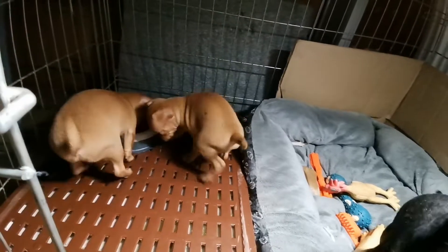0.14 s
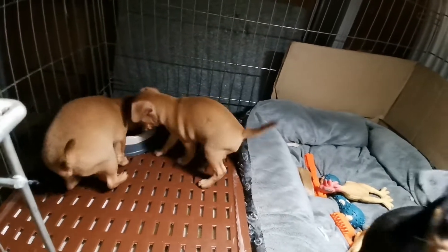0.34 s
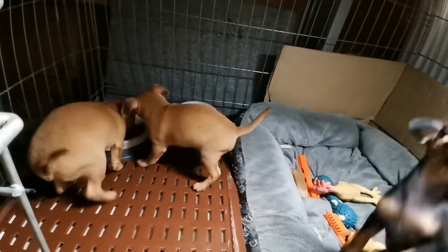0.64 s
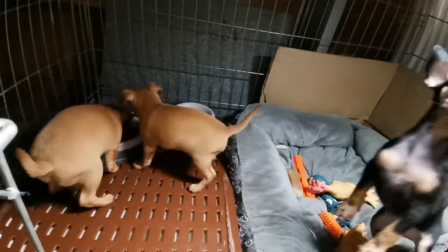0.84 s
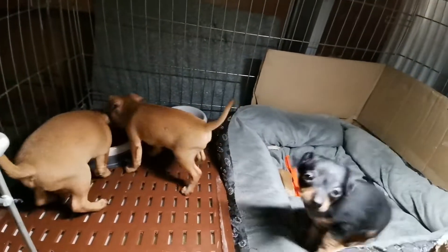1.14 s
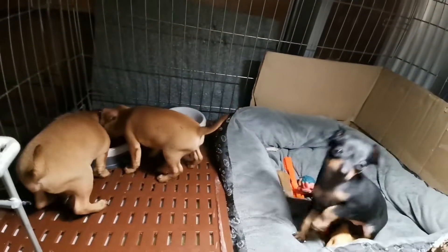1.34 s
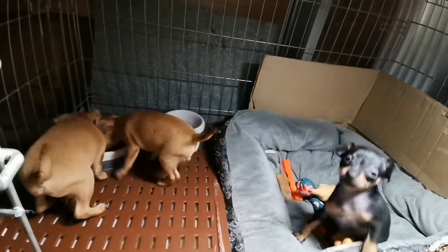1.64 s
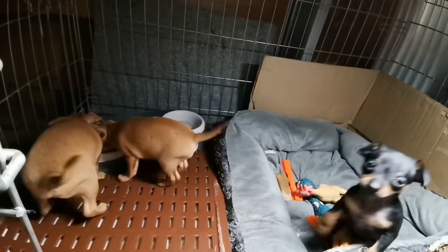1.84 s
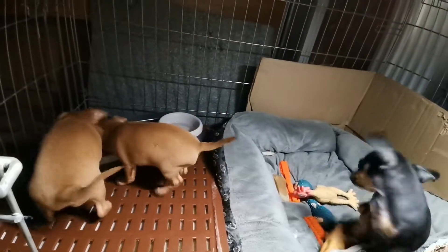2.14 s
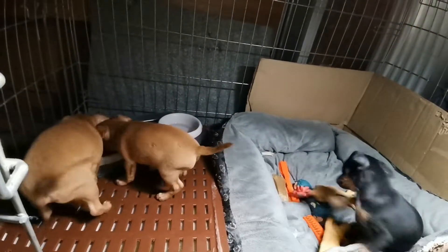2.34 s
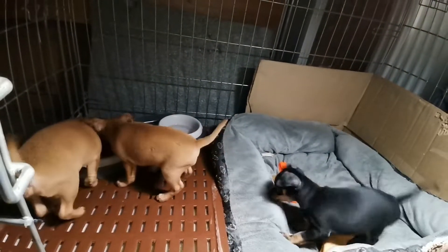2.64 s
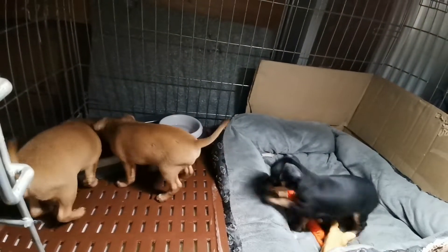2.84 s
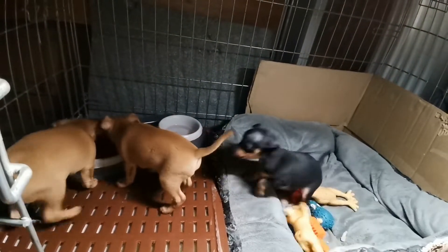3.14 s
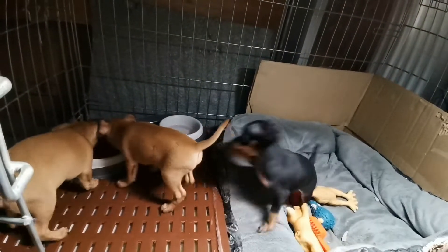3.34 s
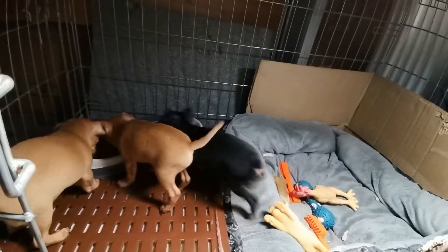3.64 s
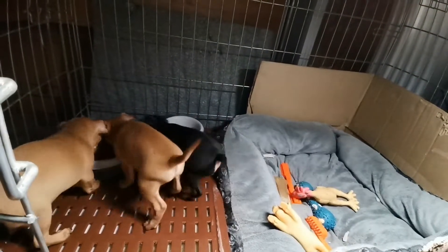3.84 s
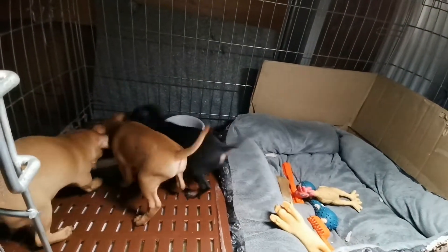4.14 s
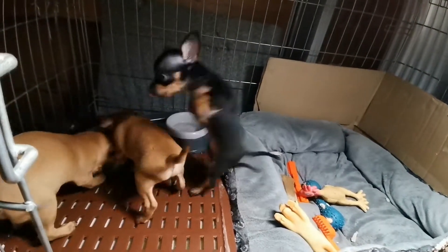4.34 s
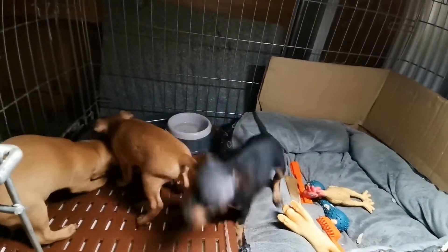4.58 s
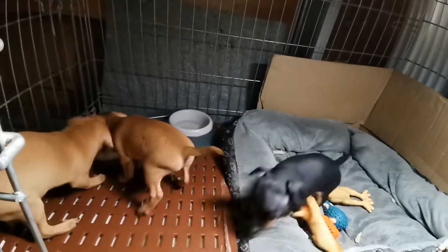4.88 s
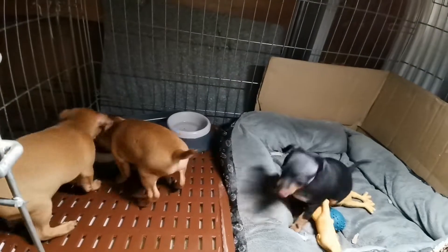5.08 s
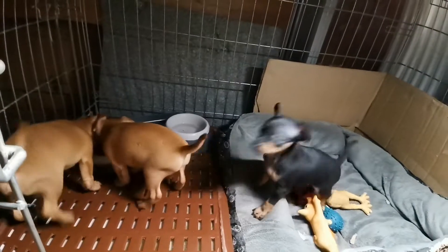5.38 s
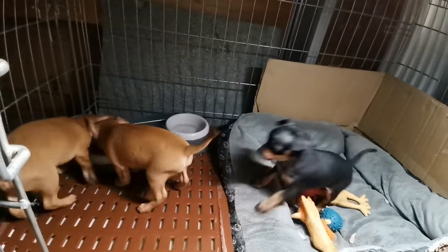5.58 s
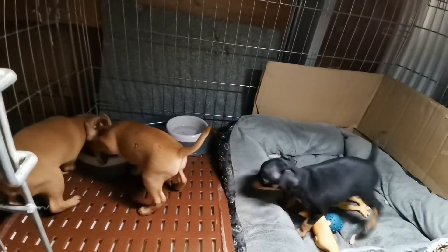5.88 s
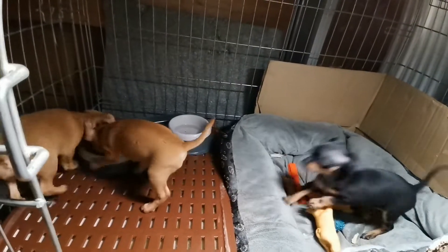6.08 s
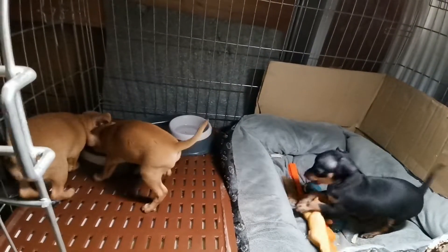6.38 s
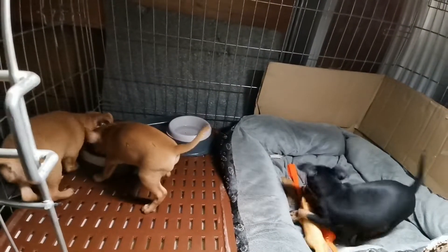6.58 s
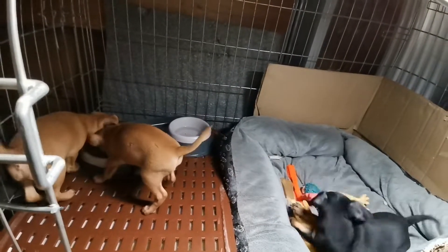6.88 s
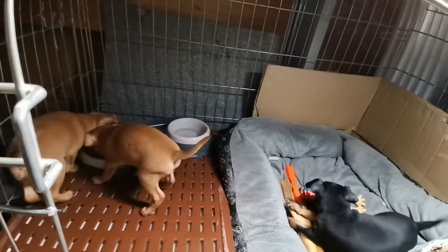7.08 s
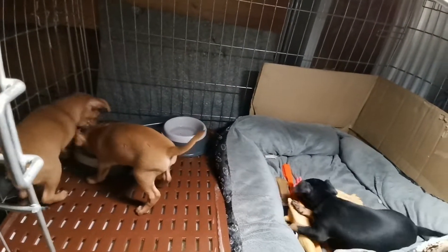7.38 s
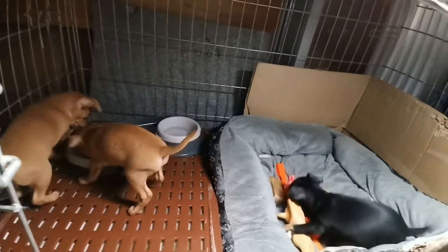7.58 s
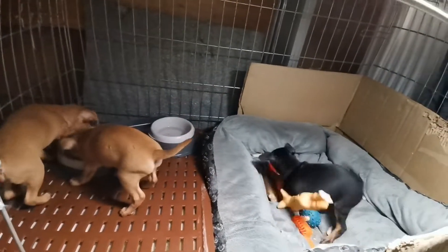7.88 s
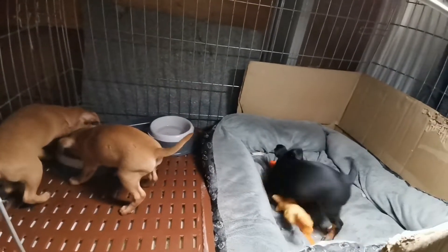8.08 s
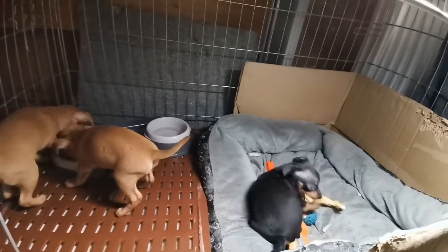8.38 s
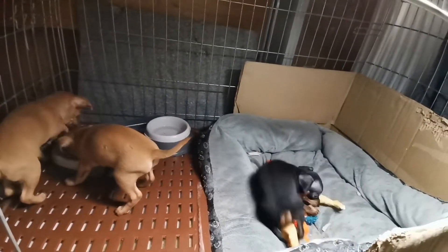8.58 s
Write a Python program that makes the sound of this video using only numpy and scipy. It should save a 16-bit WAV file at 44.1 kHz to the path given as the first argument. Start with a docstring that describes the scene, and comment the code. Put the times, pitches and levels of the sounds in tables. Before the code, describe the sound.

Puppies crunch dry kibble from a rattling bowl while another romps over soft bedding with thuds and knocks, whining hoarsely and giving a short yip.

```python
"""Kibble crunched by two puppies at a bowl on a plastic floor, in a wire pen indoors; a third romps in a cloth bed.
Pellets: noise bursts through bowl modes; teeth: narrow clicks; paws: blows through floor-panel modes.
Bedding and a slide on cardboard: grainy filtered noise under swelling gains; snuffles: nostril hiss.
Late on a puppy whines: harmonic whistles break into lower, hoarse whimpers, then a short yip and a noise snarl."""
import sys
import numpy as np
from scipy import signal
from scipy.fft import rfft, irfft, next_fast_len
from scipy.io import wavfile
from scipy.ndimage import uniform_filter1d

SR = 44100
rng = np.random.default_rng(int(sys.argv[2]) if len(sys.argv) > 2 else 0)


def output_pcm(signal):
    """Save a mono or channel-first signal as 16-bit PCM at the path in sys.argv[1].

    Samples are clipped to [-1, 1] before scaling.
    """
    pcm = np.clip(np.atleast_2d(signal).T, -1, 1) * 32767
    wavfile.write(sys.argv[1], SR, np.round(pcm).astype(np.int16))


N = 384552
T_S = np.arange(N) / SR
HIT_SAMPLES = 8192
TOP_HZ = 16100  # highest partial and final cutoff

# room tone spectrum: f/Hz, density/dB
ROOM_TONE = [(20, 4), (50, 3), (100, -9.5), (200, -14), (400, -19), (800, -22), (1600, -28), (3200, -30.5),
             (6000, -36.5), (9000, -42), (16000, -23)]
ROOM_TONE_DB = -55
# response of the two microphone ports: f/Hz, left/dB, right/dB
PORTS = [(101, -1, -1.5), (2580, 4, 4.5), (6600, 4, 0), (9940, -2.5, -4.5), (9260, -14, -17),
         (12200, -9, -14), (13800, -2, -14.5), (16300, -12.5, -15)]

# nostril air: t/s, length/s, level/dB
SNIFFS = [(4.02, 0.025, -55.5), (8.09, .05, -63), (8.31, 0.028, -52)]
SNIFF_ATTACK_S, SNIFF_RELEASE_DB_PER_S = 0.019, 260
# nostril hiss spectrum: f/Hz, density/dB
SNOUT = [(2000, -12), (4500, -37), (6000, 8.5), (7000, 5), (8000, -7), (10000, -6), (14000, -30)]
# hoarse snarl trailing off the yip: t/s, growl/dB, hiss/dB
SNARL = [(7.68, -40, -47), (7.69, -29.5, -59), (7.724, -52.5, -44.5), (7.738, -41.5, -47.5),
         (7.792, -61, -48), (7.85, -51.5, -54)]
# hoarse throat noise spectrum: f/Hz, density/dB
GROWL = [(150, -50), (330, -16.5), (600, -5), (900, 4), (1250, -11), (2000, -24.5), (3200, -39)]

# voiced whimpers, last one the yip: t/s, pitch/Hz, level/dB, bright overtones/dB, rasp/dB (before trim)
WHIMPERS = [
    [(6.365, 679, -49.5, -44.5, -50), (6.392, 486.4, -29, -50.5, -51.5), (6.435, 463, -35.5, -40, -46.5),
     (6.48, 508.7, -37, -49, -54.5), (6.562, 538, -42, -47, -50.5), (6.62, 610.6, -43, -49.5, -57),
     (6.67, 521, -41.5, -48.5, -53), (6.695, 488, -35.5, -50, -53.5), (6.755, 440.7, -45, -51, -57.5),
     (6.8, 420, -58, -71, -73)],
    [(7.025, 627, -50, -43.5, -55), (7.081, 647.4, -41, -50.5, -56), (7.099, 622.4, -50, -44, -62),
     (7.117, 505, -42.5, -61, -60), (7.125, 517, -41, -72, -56)],
    [(7.648, 620, -49, -67, -74), (7.662, 602.6, -38, -54, -59), (7.69, 645, -36.5, -46, -51),
     (7.705, 664, -48, -43.5, -46)],
]
# throat resonance: f/Hz, gain/dB
THROAT = [(400, 8), (500, -16.5), (600, -7), (750, -16), (950, 10.5), (1100, -12), (1300, -9.5),
          (1700, -50)]
# mouth resonance: f/Hz, gain/dB
MOUTH = [(1300, 6), (1500, -1.5), (2000, -0.5), (2450, -7), (3000, -18), (4000, -3)]
# high rasp of the voice: f/Hz, gain/dB
RASP = [(2400, -10), (3200, -10), (4300, -9), (5200, -6), (6400, 0), (7100, -6), (8000, -15), (9500, -26),
        (13000, -34)]
# roughness 0-1: steady, added where a whistle breaks, added as the voice frays out
STEADY_ROUGH, BREAK_ROUGH, FRAY_ROUGH = .26, .6, .7
BREAK_S, FRAY_S = .018, .05
# thin whines: t/s, pitch/Hz, level/dB, overtones/dB (before trim)
WHISTLES = [
    [(5.868, 1605, -60, -58), (5.88, 1650, -35.5, -72), (5.928, 1778, -39.5, -56),
     (5.966, 1682, -30, -47.5), (5.994, 1607, -50.5, -40), (6.04, 1534, -57, -84)],
    [(6.23, 1330, -56, -89), (6.24, 1340, -38.5, -100), (6.256, 1345, -41.5, -65),
     (6.306, 1402, -38, -55.5), (6.344, 1443, -40, -54), (6.372, 1370, -33, -52)],
    [(6.96, 1346, -38, -46), (6.966, 1434, -48, -65), (6.986, 1440, -41, -55), (7.03, 1480, -51, -48)],
]
# very high squeak before the whines: t/s, pitch/Hz, level/dB
SQUEAK = [(5.51, 9760, -60), (5.544, 9650, -49), (5.56, 9300, -50), (5.575, 9400, -78)]
# nose resonance: f/Hz, gain/dB
NOSE = [(2830, -9), (2900, 6), (3300, 1.5), (4200, -12), (5500, -0.5), (6900, -8.5), (8300, -24.5),
        (12000, -33)]
# cardboard echo, left row then right: delay/s, level/dB
ECHOES = [(.0021, -10.5), (.0034, -10)]
VOICE_ROOM_DB = -14

# bed sliding along the cardboard: t/s, length/s, level/dB
SLIDES = [(1.345, .21, -50)]
SLIDE_ATTACK_S, SLIDE_SAG_DB_PER_S, SLIDE_RELEASE_DB_PER_S = 0.023, 42, 400
# drone of the cardboard wall: f/Hz, density/dB
CARDBOARD = [(180, -0.5), (300, 9.5), (380, 0), (500, -20), (720, -0.5), (900, -6), (1200, -33),
             (3000, -50)]

# weight landing on cushion or floor: t/s, bearing down/s, level/dB
STEPS = [(0.06, 0.058, -63), (0.33, 0.63, -47.5), (1.1, .11, -45.5), (1.29, 0.14, -45.5), (1.48, .05, -62),
         (2.4, 0.073, -49), (2.535, 0.017, -43.5), (2.67, 0.036, -60), (2.92, 0.28, -55), (3.15, 0.12, -45),
         (3.24, 0.078, -37.5), (3.49, 0.057, -49), (3.58, 0.1, -47.5), (3.675, 0.035, -61),
         (3.8, 0.072, -48.5), (3.97, 0.26, -53.5), (4.19, 0.044, -51.5), (4.33, 0.072, -48.5),
         (4.49, .08, -52.5), (4.61, 0.053, -44.5), (4.72, 0.18, -37.5), (4.9, 0.18, -45),
         (5.09, 0.056, -38.5), (5.21, .1, -47), (5.52, 0.31, -56), (5.91, 0.042, -45), (6.07, 0.21, -46.5),
         (6.38, 0.082, -51), (6.68, 0.14, -50), (6.78, 0.053, -53), (7.02, 0.037, -57), (7.21, 0.039, -55),
         (7.85, .06, -47), (7.91, 0.085, -39.5), (8.02, 0.12, -44), (8.28, 0.25, -49.5),
         (8.61, 0.12, -52.5)]
STEP_ATTACK_S, STEP_SAG_DB_PER_S, STEP_RELEASE_DB_PER_S = 0.026, 14.5, 162
FIDGET_DB, FIDGET_SWING_DB = -62.5, 4  # small shifts of weight between steps
# flank or paw brushing cloth: t/s, length/s, rub/dB, hiss/dB
SCUFFS = [(0.31, 0.12, -67, -56), (0.352, 0.23, -52.5, -49), (0.55, 0.15, -58, -61),
          (0.71, 0.046, -54, -52), (1.144, 0.13, -60, -60), (1.291, 0.054, -53, -82),
          (1.722, 0.12, -62, -64), (1.928, 0.25, -79, -65.5), (2.262, .15, -62.5, -62.5),
          (2.495, 0.064, -72, -64), (2.887, 0.19, -63.5, -67), (3.153, 0.23, -56.5, -70),
          (3.658, 0.2, -55.5, -66), (3.805, 0.14, -61, -59), (4.015, 0.064, -75, -59),
          (4.094, 0.024, -56, -62), (4.477, 0.074, -51, -57.5), (4.713, .13, -43, -48),
          (4.845, 0.1, -48, -68.5), (4.966, 0.045, -46.5, -52), (5.064, 0.091, -53.5, -70),
          (5.856, 0.13, -50.5, -65), (6.031, 0.16, -55, -62), (6.744, 0.44, -62, -68),
          (7.847, 0.27, -57, -70), (8.087, 0.3, -61, -67), (8.266, 0.23, -62, -66)]
SCUFF_ATTACK_S, SCUFF_SAG_DB_PER_S, SCUFF_RELEASE_DB_PER_S = 0.027, 17, 209
FUR_RUB_DB, FUR_HISS_DB = -74, -73  # feeders' coats brushing together
# cushion thud spectrum: f/Hz, density/dB
CUSHION = [(25, -2.5), (55, -4), (90, 2), (130, -2), (180, -1), (300, -11.5), (500, -19.5), (1000, -48)]
# cloth rub spectrum: f/Hz, density/dB
RUB = [(150, -41), (330, 3), (550, -2.5), (780, -1), (1000, -0.5), (1500, -8), (2500, -13), (5000, -26.5)]
# fibre and breath hiss spectrum: f/Hz, density/dB
HISS = [(900, -31), (1800, -6.5), (3000, -5), (4500, 0.5), (7000, -5), (9000, -2.5), (12000, 0.5),
        (16000, -6.5)]

# source levels; event levels of kibble, teeth and paws count from these
KIBBLE_DB, TEETH_DB, PAWS_DB = -9.5, -7, 2
# paw or body on floor, bed or cardboard: t/s, knock/dB, low thud/dB, treble slope/dB per octave (soft pads steep)
KNOCKS = [(.512, -4, -16, -8.5), (.657, -15, -25, -6), (1.117, 0, -5, -18), (1.125, -1.5, -13, -12),
          (1.216, 1.5, -14, -15.5), (1.377, -13, -28, -16), (1.593, -15.5, -23.5, -21),
          (2.549, -0.5, -14.5, -4), (3.163, -14, -22, -1), (3.183, -8.5, -14, -5.5), (3.212, -1, -14, -8.5),
          (3.257, 0.5, -10, -6), (3.684, -8, -10.5, -7.5), (3.695, -11, -16, -5), (3.777, -19, -23, -2.5),
          (4.337, -50, -19.5, -12), (4.406, -6.5, -14, -21), (4.617, -14.5, -9, -10),
          (4.733, -3, -14, -9.5), (4.747, -11, -27, -12), (4.767, -10, -23, -4.5), (4.787, -15.5, -26, 1),
          (4.846, -16.5, -22, 0), (4.973, -13.5, -26, -2.5), (5.096, -27, -14, -1.5),
          (5.144, -20, -10.5, -5), (5.55, -15.5, -33, -20), (5.823, -6, -34, -11), (6.093, -13, -35, -8),
          (7.857, -7, -24, -16), (7.906, -7.5, -17.5, -35), (7.946, -8, -27, -5), (8.085, -3, -12, -19),
          (8.375, -9.5, -20, -27), (8.396, -9, -20, -39)]
# floor panel modes, nominal: f/Hz, width/Hz, gain/dB
PANEL = [(184, 45, 5.9), (595, 170, 2.3), (770, 150, 6.4), (1016, 94, 13.8), (1830, 1000, 5.1),
         (3180, 700, 6.9)]
PAW_RATTLE_S, PAW_CONTACT_DB = 0.0047, -2
# teeth closing on crumbs: t/s, level/dB, click pitch/Hz
CHEWS = [(1.754, -16, 4140), (2.077, -15, 4430), (2.258, -16.5, 4200), (2.313, -13.5, 4570),
         (2.335, -8, 4580), (2.378, -11, 4730), (2.589, -8, 4550), (2.634, 1, 4800), (2.843, -5.5, 4960),
         (2.861, -9, 4800), (2.891, -10, 4830), (2.945, -9.5, 4660), (4.389, -15, 5900), (5.739, -19, 7100),
         (6.057, -5.5, 5130), (7.088, -12, 5100), (7.443, -20, 4270)]
NIBBLES, NIBBLE_MIN_DB, NIBBLE_MID_HZ = 30, -30, 4700  # faint bites at random times
# pellet breaking or dropping in the bowl: t/s, crack/dB, bowl ring/dB, brittle snap/dB
CRACKS = [(.08, -11, -11, -12), (.115, -15, -9.5, -40), (.196, -26, -12.5, -43), (.22, -13.5, -11, -12.5),
          (0.971, -22, -27, -28), (1.82, -11.5, -20, -9.5), (1.858, -6, -9.5, -23), (1.98, -12, -13.5, -30),
          (2.001, -15, -7, -50), (2.478, -9, -8.5, -19), (2.694, -17, -53, -18), (2.754, -16.5, -52, -16),
          (3.14, -11.5, -21, -3), (3.831, -17.5, -11, -35), (3.978, -11, -24, -10.5), (4.16, -1, 3, -4.5),
          (4.198, -14, -10, -16), (4.222, -16, -14, -25), (4.272, -24, -38, -17), (4.497, -5, -9.5, -9),
          (4.532, -16, -6.5, -28), (4.719, -11, -21, -8.5), (4.91, -43, -6, -51),
          (5.298, -5.5, -17.5, -8.5), (5.331, -20, -13.5, -43), (5.534, -20.5, -5.5, -31),
          (5.991, -6.5, -9.5, -8.5), (6.174, -26, -21, -17.5), (6.297, -12, -10, -23),
          (6.661, -8, -19, -25), (6.899, -21.5, -38, -21), (6.964, -11.5, -13, -10),
          (7.942, -13.5, -19, -13), (8.262, -7, -15, -7.5), (8.272, -5.5, -18, -25)]
# bowl modes, nominal: f/Hz, width/Hz, gain/dB
BOWL = [(1520, 300, 12), (2400, 340, 12), (4100, 600, 8), (4850, 400, 7), (6200, 900, 3)]
CRUMBLE_S, BOWL_RATTLE_S = .0028, .0035
KIBBLE_PAN_DB, KIBBLE_PAN_SPREAD_DB = 3, 2  # left minus right


def undb(db):
    """Decibels to gain."""
    return 10 ** (np.asarray(db) / 20)


def unit(x):
    """Scale to rms 1."""
    return x / np.sqrt(np.mean(x ** 2) + 1e-18)


def curve(rows):
    """Every column of a time table, sample by sample."""
    t_s, *columns = np.transpose(rows)
    return [np.interp(T_S, t_s, c) for c in columns]


def gate(rows, edge_s):
    """Open over the span of a table, with soft edges."""
    inside_s = np.minimum(T_S - rows[0][0], rows[-1][0] - T_S)
    return np.clip(inside_s / edge_s + .5, 0, 1)


def db_at(points, hz):
    """Read a spectrum on a log-frequency axis."""
    f_hz, db = np.transpose(points)
    return np.interp(np.log(hz + 1), np.log(f_hz), db)


def bins_hz(size):
    """Frequencies of a real transform."""
    return np.arange(size // 2 + 1) * SR / size


def colour(x, points):
    """Filter by a spectrum."""
    size = next_fast_len(x.shape[-1], True)
    gain = undb(db_at(points, bins_hz(size)))
    return irfft(rfft(x, size) * gain, size)[..., :x.shape[-1]]


def diffuse(size, apart_hz=1100):
    """Noise from all sides at two ports: alike in the bass, unrelated in the treble."""
    fast = next_fast_len(size, True)
    mid, side = rfft(rng.standard_normal((2, fast)))
    like = .85 / (1 + (bins_hz(fast) / apart_hz) ** 2)
    side = side * np.sqrt(1 - like) * np.array([[1], [-1]])
    return unit(irfft(mid * np.sqrt(1 + like) + side, fast)[:, :size])


def walk(rate_hz, size=N):
    """Random levels held 1 / rate_hz and slewed; spread near 1."""
    hold = max(int(SR / rate_hz), 2)
    steps = np.repeat(rng.standard_normal(size // hold + 1), hold)
    return 1.065 * uniform_filter1d(steps, hold)[:size]


def add(out, t_s, sound):
    """Mix a short sound in at t_s."""
    i = max(int(t_s * SR), 0)
    out[:, i:i + sound.shape[1]] += sound[:, :N - i]


def swells(rows, attack_s, sag_db_per_s, release_db_per_s):
    """Gain of overlapping movements: each builds up, sags while it lasts, dies away; powers add."""
    power = np.zeros((1, N))
    for start_s, length_s, db in rows:
        t_s = np.arange(int((length_s + .5) * SR)) / SR
        fall_db = sag_db_per_s * t_s + release_db_per_s * np.maximum(t_s - length_s, 0)
        gain = np.minimum(t_s / attack_s, 1) * undb(db - fall_db)
        add(power, start_s, gain[None] ** 2)
    return np.sqrt(power[0])


def rustle(spectrum, grain_db, grain_hz, surge_db):
    """Fibres catch and let go in tiny slips, bunched into surges; tanh bounds the largest slip."""
    slips_db = grain_db * np.tanh(walk(grain_hz)) + surge_db * np.tanh(walk(45))
    return unit(colour(diffuse(N) * undb(slips_db), spectrum))


def resonances(modes, scatter=0):
    """dB that a body's modes add to a blow; pitch and strength scatter with the spot struck."""
    hz = bins_hz(HIT_SAMPLES)
    spots = scatter * rng.uniform(-1.67, 1, (len(modes), 2))
    total_db = 0
    for (f_hz, width_hz, db), (shift, strength) in zip(modes, spots):
        detune = 2 * (hz - f_hz * (1 + shift)) / width_hz
        total_db = total_db + db * (1 + 5 * strength) / (1 + detune ** 2)
    return total_db


def blow(gain_db, rattle_s, contact_db, tail_db, tail_t60_s):
    """Contact, burst of after-contacts and near echoes, and room tail, through a causal body response."""
    t_s = np.arange(HIT_SAMPLES) / SR
    grain = np.repeat(undb(7 * np.tanh(rng.standard_normal(HIT_SAMPLES // 32))), 32)
    envelope = np.exp(-t_s / max(rattle_s, 1e-3)) * (1 - np.exp(-t_s / 0.0011))
    burst = unit(diffuse(HIT_SAMPLES) * grain * envelope)
    tail = unit(diffuse(HIT_SAMPLES) * np.exp(-np.log(1000) * t_s / tail_t60_s))
    push = (burst + undb(tail_db) * tail) / np.sqrt(HIT_SAMPLES)
    push[[0, 1], rng.integers(12, size=2)] += undb(contact_db)
    # flatten the push across broad bands, so the body alone sets the colour
    force = rfft(push)
    power = uniform_filter1d(np.abs(force.mean(0)) ** 2, size=70)
    # fold the cepstrum: minimum phase
    cepstrum = irfft(np.log(undb(gain_db) / np.sqrt(power)))
    cepstrum[1:HIT_SAMPLES // 2] *= 2
    cepstrum[HIT_SAMPLES // 2 + 1:] = 0
    return irfft(force * np.exp(rfft(cepstrum)))


def partials(hz, orders, spectrum, waver_db=0):
    """Harmonics of a moving pitch under a resonance curve; each wavers by itself as the head turns."""
    phase = 2 * np.pi * np.cumsum(hz) / SR
    tone, power = 0, 0
    for k in orders:
        level_db = db_at(spectrum, k * hz) + waver_db * walk(29.5, size=len(hz))
        gain = undb(level_db) * (k * hz < TOP_HZ)
        tone = tone + gain * np.sin(k * phase + rng.uniform(0, 2 * np.pi))
        power = power + gain ** 2
    return tone / np.sqrt(power / 2)


def room_tone():
    """Steady diffuse noise, strongest in the bass."""
    return undb(ROOM_TONE_DB) * unit(colour(diffuse(N), ROOM_TONE))


def snuffles():
    """Unvoiced air: the snarl after the yip, and hiss through small nostrils."""
    growl_db, hiss_db = curve(SNARL)
    growl = rustle(GROWL, grain_db=3, grain_hz=200, surge_db=1) * undb(growl_db)
    hiss = rustle(HISS, grain_db=1.5, grain_hz=930, surge_db=2) * undb(hiss_db)
    sniff_gain = swells(SNIFFS, SNIFF_ATTACK_S, 0, SNIFF_RELEASE_DB_PER_S)
    nostrils = unit(colour(diffuse(N), SNOUT)) * sniff_gain
    return gate(SNARL, 0.025) * (growl + hiss) + nostrils


def pen(x, echoes, room_db, room_t60_s):
    """Voice reaches the right port first; each port gets a cardboard echo, then the room's short tail."""
    t_s = np.arange(2 * HIT_SAMPLES) / SR
    decay = (t_s > .004) * np.exp(-np.log(1000) * t_s / room_t60_s)
    tail = unit(diffuse(len(t_s), apart_hz=600) * decay)
    response = undb(room_db) * tail / np.sqrt(len(t_s))
    response[[0, 1], [5, 0]] += 1  # direct sound, delays in samples
    for port, (delay_s, db) in enumerate(echoes):
        response[port, int(delay_s * SR)] += undb(db)
    return signal.fftconvolve(x[None], response, axes=1)[:, :N]


def hoarseness(t_s, end_s):
    """The voice cracks where a whistle drops into it, and frays as it runs out."""
    from_break_s = np.min([np.abs(t_s - rows[-1][0]) for rows in WHISTLES], axis=0)
    cracking = BREAK_ROUGH * np.exp(-(from_break_s / BREAK_S) ** 2)
    fraying = FRAY_ROUGH * np.exp((t_s - end_s) / FRAY_S)
    return np.clip(STEADY_ROUGH + cracking + fraying, 0, .9)


def whimper():
    """Two strong harmonics in the throat, brighter ones in the mouth, and a rasp pulsing with the cycle."""
    out, jitter, flutter, shimmer = np.zeros(N), walk(300), walk(2500), walk(160)
    husk_spectrum = [(500, -30), *MOUTH, (9000, -45)]
    air, growl, husk = (unit(colour(rng.standard_normal(N), s)) for s in (RASP, GROWL, husk_spectrum))
    for rows in WHIMPERS:
        opening = gate(rows, .008)
        on = opening > 0
        hz, db, bright_db, rasp_db = (c[on] for c in curve(rows))
        rough = hoarseness(T_S[on], rows[-1][0])
        hz = hz * (1 + (.004 + .1 * rough ** 2) * jitter[on] + .004 * flutter[on])
        puffs = 1 + np.sin(2 * np.pi * np.cumsum(hz) / SR)
        # roughness trades harmonics for noise
        throat = partials(hz, [1, 2], THROAT, waver_db=2) * np.sqrt(1 - rough ** 2 / 2)
        throat = throat + (.03 + .15 * rough + .45 * rough ** 2) * growl[on]
        mouth = partials(hz, range(3, 6), MOUTH, waver_db=4) * np.sqrt(1 - rough ** 2)
        mouth = mouth + rough * husk[on]
        rasp = .45 * air[on] * puffs + .8 * partials(hz, range(6, 17), RASP, waver_db=5)
        rasp_gain = undb(rasp_db - 2.5 + 1.2 * shimmer[on])
        tone = undb(db) * throat + undb(bright_db) * mouth + rasp_gain * rasp
        out[on] += opening[on] * tone * undb(4 * rough * shimmer[on])
    return out


def whistle():
    """Nearly pure whistles with faint overtones from the nose, announced by one very high squeak."""
    out, jitter, shimmer = np.zeros(N), walk(400), walk(110)
    for rows in WHISTLES:
        opening = gate(rows, 0.014)
        on = opening > 0
        hz, db, over_db = (c[on] for c in curve(rows))
        hz = hz * (1 + .005 * jitter[on])
        fundamental = undb(db) * partials(hz, [1], NOSE)
        overtones = undb(over_db - 0.5) * partials(hz, range(2, 7), NOSE, waver_db=6)
        out[on] += opening[on] * (fundamental + overtones) * undb(.6 * shimmer[on])
    hz, db = curve(SQUEAK)
    squeak = partials(hz * (1 + 0.0062 * jitter), [1], NOSE)
    return out + gate(SQUEAK, .01) * undb(db) * squeak


def slide():
    """Cloth drags over the cardboard wall, which drones in two broad resonances."""
    drag = swells(SLIDES, SLIDE_ATTACK_S, SLIDE_SAG_DB_PER_S, SLIDE_RELEASE_DB_PER_S)
    return drag * rustle(CARDBOARD, grain_db=1, grain_hz=150, surge_db=2)


def scuff_gain(column):
    """Gain of one level column of the scuffs."""
    rows = [(row[0], row[1], row[column]) for row in SCUFFS]
    return swells(rows, SCUFF_ATTACK_S, SCUFF_SAG_DB_PER_S, SCUFF_RELEASE_DB_PER_S)


def bedding():
    """Cushion thuds under each step while cloth and fur rub; the feeders keep fidgeting and brushing."""
    fidget = undb(FIDGET_SWING_DB * walk(9))
    steps = swells(STEPS, STEP_ATTACK_S, STEP_SAG_DB_PER_S, STEP_RELEASE_DB_PER_S)
    weight = np.hypot(steps, undb(FIDGET_DB) * fidget)
    rub = np.hypot(scuff_gain(2), undb(FUR_RUB_DB) * fidget)
    hiss = np.hypot(scuff_gain(3), undb(FUR_HISS_DB) * fidget)
    return (rustle(CUSHION, grain_db=3.5, grain_hz=88, surge_db=3.0) * weight
            + rustle(RUB, grain_db=2.0, grain_hz=280, surge_db=6.5) * rub
            + rustle(HISS, grain_db=3.0, grain_hz=750, surge_db=6.0) * hiss)


def paws():
    """Soft blows on plastic and cardboard: low thud, knock, panel modes and a treble slope set per blow."""
    out, hz = np.zeros((2, N)), bins_hz(HIT_SAMPLES)
    octaves_up = np.log2(np.maximum(hz / 1100, 1))
    for t_s, knock_db, thud_db, slope_db in KNOCKS:
        shape = [(35, thud_db - 16), (130, thud_db + 9.5), (280, thud_db + 15),
                 (520, knock_db + 2.5), (1050, knock_db - 10.0)]
        body_db = db_at(shape, hz) + slope_db * octaves_up + resonances(PANEL, scatter=0.068)
        add(out, t_s, blow(body_db, PAW_RATTLE_S, PAW_CONTACT_DB, tail_db=-1.0, tail_t60_s=0.19))
    return out * undb(PAWS_DB)


def teeth():
    """Each bite is a small click in the narrow hollow of a muzzle."""
    out = np.zeros((2, N))
    nibbles = [(when * T_S[-1], NIBBLE_MIN_DB + 6 * force, NIBBLE_MID_HZ * 2 ** (gape - .5))
               for when, force, gape in rng.random(size=(NIBBLES, 3))]
    for t_s, db, hz in [*CHEWS, *nibbles]:
        shape = [(hz * .25, -24), (hz * 0.6, -21), (hz * 0.98, 0), (hz * 1.17, -9), (hz * 2, -19)]
        body_db = db + db_at(shape, bins_hz(HIT_SAMPLES))
        add(out, t_s, blow(body_db, .004, contact_db=-22.0, tail_db=-6.0, tail_t60_s=0.19))
    return out * undb(TEETH_DB)


def kibble():
    """Hard pellets snap and ring the bowl, each at another spot; more bowl ring means a longer rattle."""
    out = np.zeros((2, N))
    for t_s, crack_db, ring_db, snap_db in CRACKS:
        shape = [(120, ring_db - 32), (350, ring_db - 17), (950, ring_db - 9.5), (1400, ring_db - 4),
                 (2500, ring_db - 5.5), (4200, crack_db - 3.5), (7500, crack_db - 2.5),
                 (12000, snap_db + 9.0)]
        body_db = db_at(shape, bins_hz(HIT_SAMPLES)) + resonances(BOWL, scatter=.05)
        in_bowl = undb(ring_db) / (undb(ring_db) + undb(crack_db))
        rattle_s = CRUMBLE_S + BOWL_RATTLE_S * in_bowl
        sound = blow(body_db, rattle_s, contact_db=-11.5, tail_db=-3.5, tail_t60_s=0.17)
        pan_db = KIBBLE_PAN_DB + KIBBLE_PAN_SPREAD_DB * rng.standard_normal()
        add(out, t_s, sound * undb(np.array([[pan_db], [-pan_db]]) / 2))
    return out * undb(KIBBLE_DB)


def scene():
    """All three puppies over the quiet of the room."""
    voice = pen(whistle() + whimper(), ECHOES, VOICE_ROOM_DB, room_t60_s=.18)
    return room_tone() + snuffles() + voice + slide() + bedding() + paws() + teeth() + kibble()


def record(dry):
    """Each port has its own treble; a steep low-pass cuts the top."""
    ports = np.array(PORTS)
    heard = np.array([colour(dry[c], ports[:, [0, c + 1]]) for c in range(2)])
    low_pass = signal.ellip(10, .2, 70, TOP_HZ, fs=SR, output="sos")
    return signal.sosfilt(low_pass, heard)


dry = scene()
out = record(dry)
output_pcm(out)
```